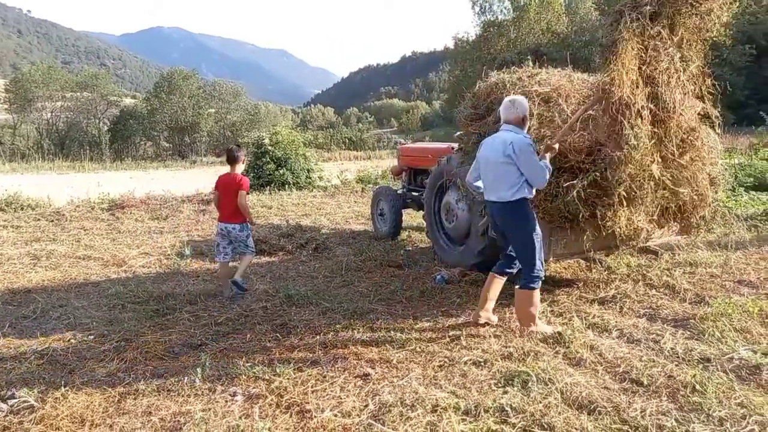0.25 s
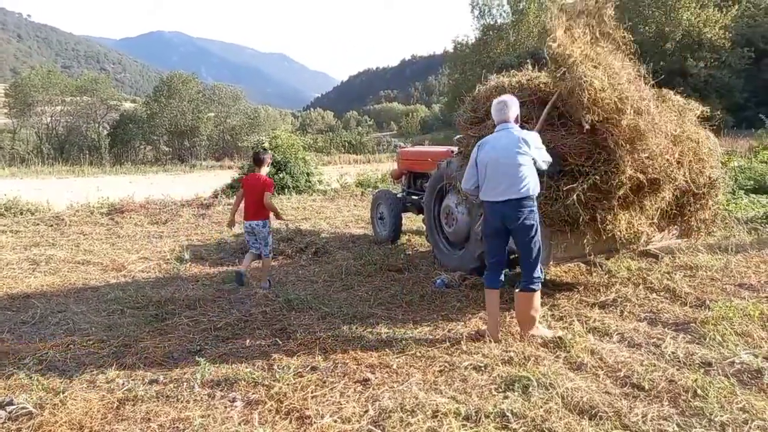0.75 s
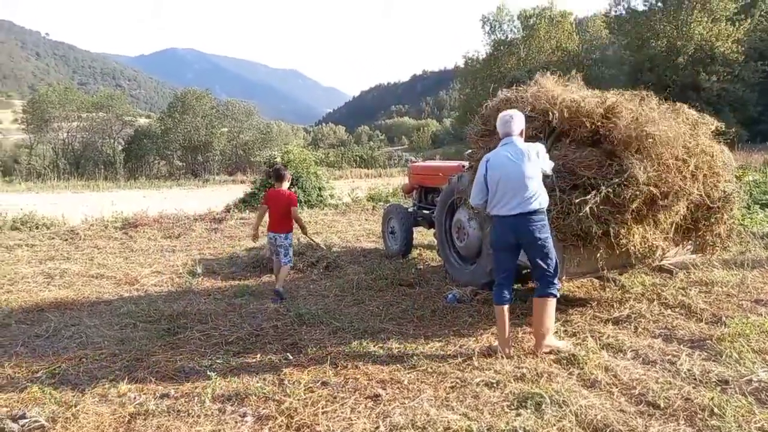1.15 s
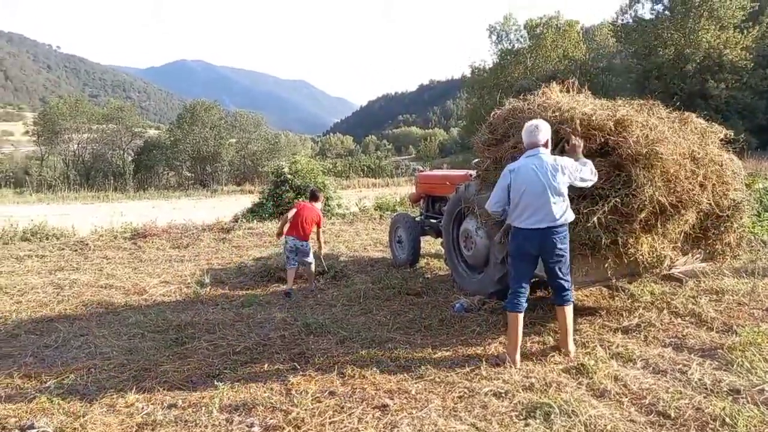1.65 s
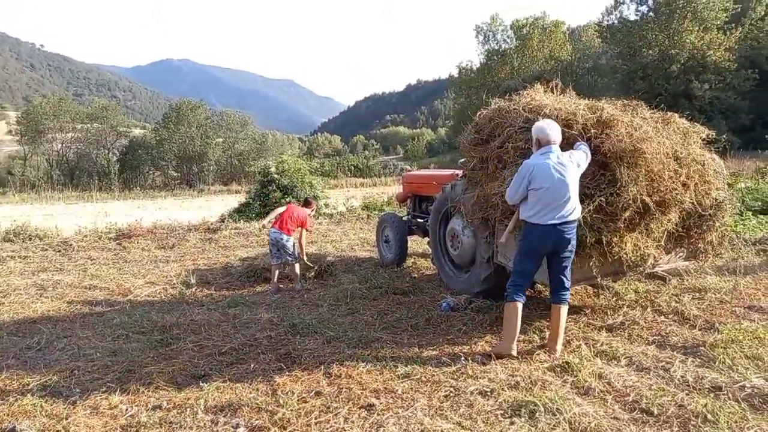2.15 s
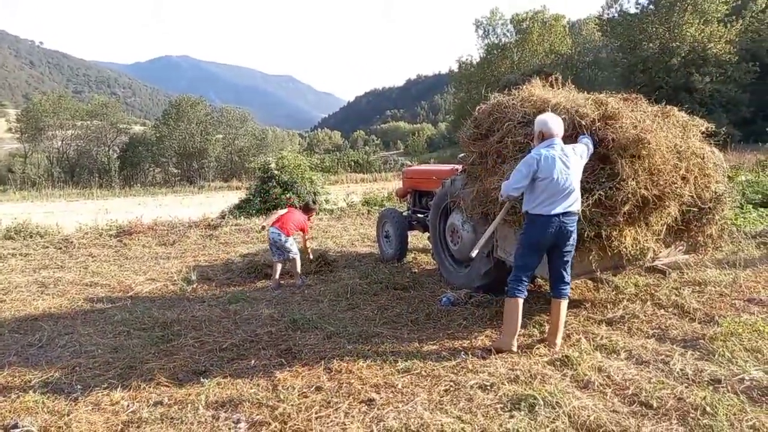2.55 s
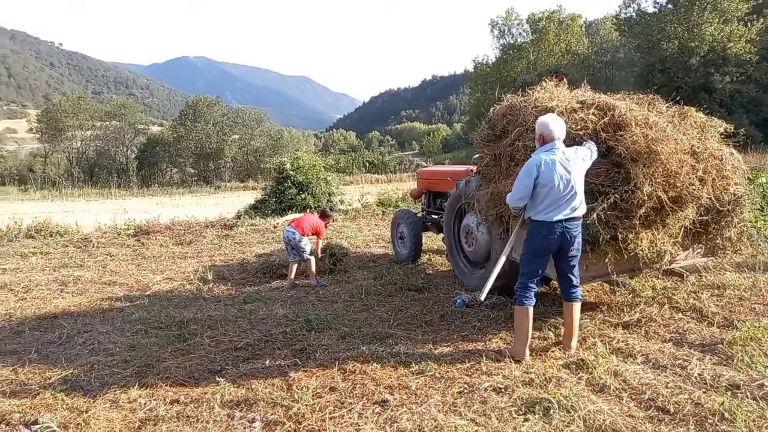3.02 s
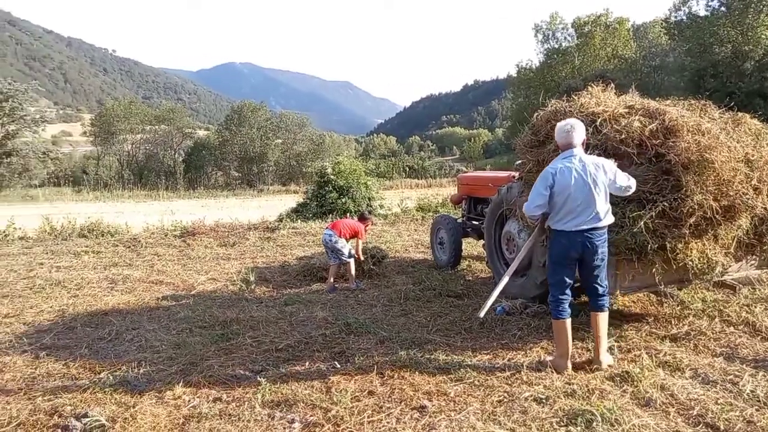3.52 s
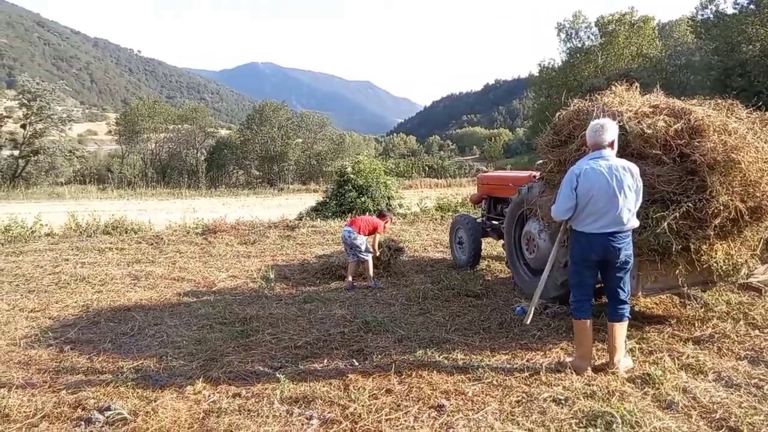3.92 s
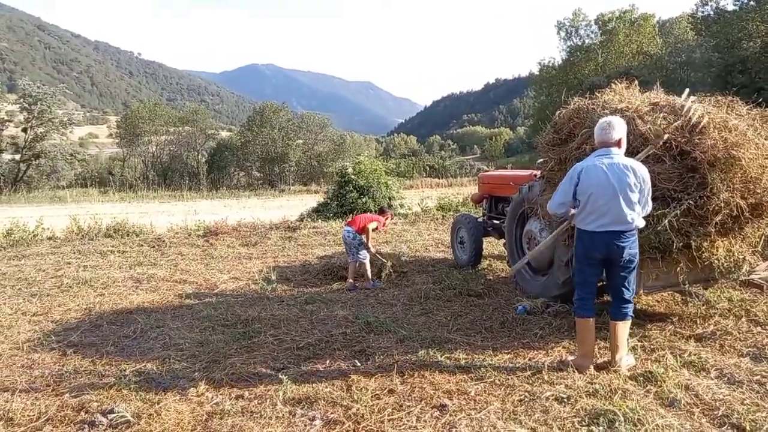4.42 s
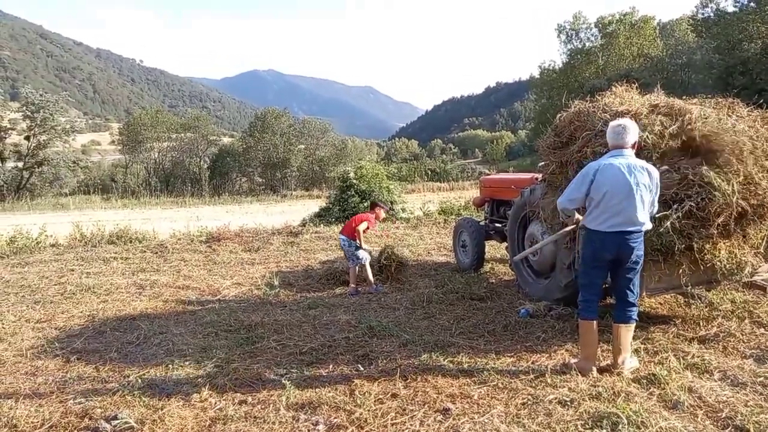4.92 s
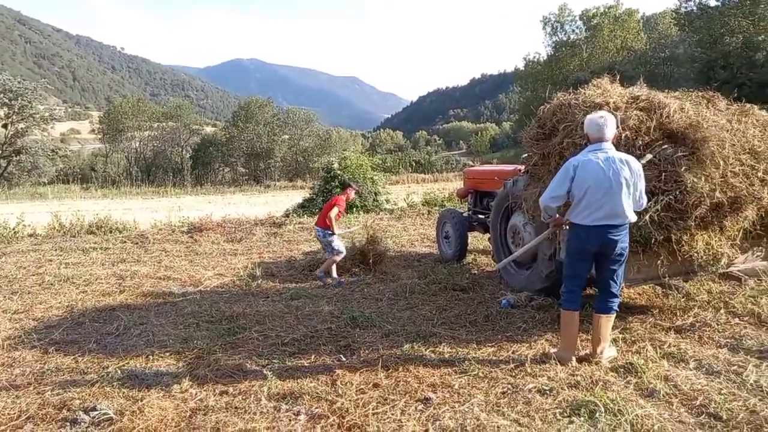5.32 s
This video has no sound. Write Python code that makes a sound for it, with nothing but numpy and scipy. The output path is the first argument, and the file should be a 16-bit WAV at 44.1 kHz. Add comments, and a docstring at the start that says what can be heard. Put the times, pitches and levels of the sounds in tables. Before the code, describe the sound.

Outdoors in an open field, a few metres from a stereo microphone, dry hay rustles faintly, then a forkful lands with a bright crackling rush and soft thump. Faint wood knocks and a tiny creak follow, then longer rustling as the load is pressed. It quiets until one loud, short fork stroke, which trails off in crackles. A very faint low engine and airy hush lie beneath.

```python
"""Dry hay is forked onto a trailer in an open field, a few metres from a two-port microphone.
First small rustles, then near 0.9 s a forkful lands and slumps; wood knocks and creaks near 1.6 s.
From 1.9 s a hand presses the load; quiet rustling follows, until one hard fork stroke near 4.9 s trails off.
Hay is dense filtered clicks, bright for thin stalks and deep for stems; snaps and scuffs are shaped noise,
knocks damped tones. Behind run a two-tone engine, noise for air and far rush, and low swelling bumps."""
import sys
import numpy as np
from scipy import signal
from scipy.fft import rfft, irfft
from scipy.io import wavfile

SR = 44100
rng = np.random.default_rng(int(sys.argv[2]) if len(sys.argv) > 2 else 0)


def materialize(psi):
    """Save the field psi as 16-bit PCM at rate SR to the path in sys.argv[1].

    A 1-D psi becomes a single channel; in a 2-D psi each row is a channel.
    """
    bounded = np.clip(np.atleast_2d(psi).T, -1, 1)
    quanta = np.round(bounded * 32767).astype(np.int16)
    wavfile.write(sys.argv[1], SR, quanta)


N = 245390
TIME = np.arange(N) / SR  # s

# Levels are those before the colour of the microphone ports; left and right are the two ports.
# open-air background spectrum: f/Hz, level/dB
FIELD_SPECTRUM = [(22, -27), (42, -6.5), (75, 6), (125, -0.5), (190, -13.5), (330, -12), (560, -19.5),
                  (880, -13), (1400, -17.5), (2100, -24.5), (3200, -31.5), (6500, -14.5), (12000, -15.5),
                  (15800, -19)]
# far rush, its treble lost over the distance: f/Hz, level/dB
FAR_RUSH_SPECTRUM = [(100, -14), (300, -7.5), (550, -9.5), (800, 1), (1050, 3.5), (1500, -3), (1900, -19),
                     (3000, -22.5), (8000, -54)]
# level of the far engine over time: t/s, level/dB
ENGINE_LEVEL = [(0, -60.5), (.8, -60.5), (1.8, -56.5), (3.4, -62.5), (4.8, -59.5), (5.4, -57)]
# low bumps: wind or handling at the microphone, and at 0.91 and 1.04 s the thump of the landing load:
# centre t/s, peak level/dB, f/Hz, Gaussian spread/s, left minus right/dB
LOW_BUMPS = [(0.475, -47, 79.4, 0.014, 3.5), (0.91, -47.5, 77, 0.053, 0), (1.042, -45, 80, 0.02, 5),
             (2.208, -64, 45.7, 0.024, 18.5), (3.909, -48, 71.85, 0.025, 16.5),
             (4.121, -52, 69.2, 0.0065, 26), (4.241, -52, 64.8, 0.022, 28.5)]
# soft thuds of weight on the trailer bed: centre t/s, level at the centre/dB, Gaussian spread/s
BED_THUDS = [(0.904, -61, 0.11), (2.49, -63.5, 0.071)]
# spectrum of the shaken trailer bed: f/Hz, level/dB
BED_SPECTRUM = [(25, -12), (60, 6), (140, -6.5), (260, -9), (450, -17.5), (900, -31), (3000, -52)]
# dull scuffs of feet and clothes: centre t/s, level at the centre/dB, Gaussian spread/s, centre f/Hz
SOFT_SCUFFS = [(1.685, -65, 0.021, 940), (1.88, -68.5, 0.02, 1030), (2.51, -65.5, 0.046, 780),
               (3.187, -63.5, 0.016, 550), (4.08, -68, 0.025, 950), (4.22, -74, 0.03, 850),
               (5.047, -65.5, 0.11, 940)]
# dull knocks of the fork and of feet:
# t/s, ring level/dB, ring f/Hz, ring decay by 60 dB/s, contact click against the ring/dB, click f/Hz
DULL_KNOCKS = [(0.089, -50.5, 267, 0.028, -8, 410), (0.636, -55.5, 1360, 0.014, -5, 1300),
               (1.644, -56.5, 1380, 0.016, 6, 2400), (1.895, -48.5, 950, 0.018, -4, 450),
               (3.159, -58.5, 254, 0.07, -5, 350), (3.176, -53, 920, 0.029, -5, 750),
               (3.185, -55, 520, 0.033, -7, 600), (3.205, -64, 680, .015, -2, 446),
               (5.427, -62, 345, 0.015, 4.5, 864)]
# one short creak of wood under strain: t/s, level/dB, starting f/Hz, length/s
WOOD_CREAK = (1.641, -60, 478, 0.033)
# single stalks that snap: t/s, peak level before SNAP_TRIM_DB/dB, centre f/Hz
STALK_SNAPS = [(0.0935, -42, 8450), (0.162, -47, 12500), (0.5822, -44, 6840), (0.618, -42, 12600),
               (1.848, -45, 12300), (1.92, -37, 12500), (1.926, -32, 12500), (2.128, -39, 12700),
               (2.233, -37, 12500), (2.367, -35, 8100), (3.847, -56, 12430), (3.884, -46, 11500),
               (3.934, -49, 8250), (4.0165, -45, 12300), (4.672, -45, 6760), (4.693, -38.5, 12200),
               (4.81, -41, 12000), (5.055, -34, 13000), (5.423, -44.5, 12300), (5.43, -42, 12100),
               (5.4637, -38, 12400)]
# spectrum of thin stalks rubbing: f/Hz, level/dB
STALK_SPECTRUM = [(300, -58.5), (1000, -21.5), (2200, -30), (3200, -12.5), (4200, -6.5), (5500, -6),
                  (7000, 0), (8200, -2), (10000, 0), (12500, 1.5), (15800, -2)]
# spectrum of thick stems bending inside the load: f/Hz, level/dB
STEM_SPECTRUM = [(25, -23), (60, -10), (200, -15.5), (450, -14.5), (600, -7.5), (780, 1), (1050, -4),
                 (1400, 3), (1800, 0), (2100, 3.5), (2450, 4.5), (3000, 6), (5000, -1.5), (9000, -4),
                 (15000, -12)]
# each push, toss or pat of hay swells, holds and dies away: full at t/s, rustle level before trim/dB, rise/s,
# hold/s, fall/s, deep crunch against the rustle before trim/dB, delay at the left/ms, sheen of fine tips/dB.
# At 0.78 s loose hay trails from the raised fork; at 0.80 s the forkful's edge catches the load,
# at 0.86 s it lands, at 1.05 s it slumps; at 1.92 s a hand presses the load into shape;
# at 4.86 s the tines slide in, at 4.91 s comes one hard stroke of the fork.
HAY_STROKES = [(0.078, -63.5, 0.063, 0.0091, 0.04, -18, 0.12, 4.5),
               (0.144, -63.5, 0.11, 0.01, 0.045, -15.5, 0.13, 0.5),
               (0.236, -56.5, 0.067, 0.0095, 0.025, -20, 0.27, 1.5),
               (0.395, -65, 0.05, 0.011, 0.06, -10, 0.094, 0),
               (0.583, -59, 0.098, 0.05, 0.13, -14, 0.12, -6),
               (0.78, -49.5, 0.48, 0.17, 0.45, -27, 0.16, 0),
               (0.799, -44.5, 0.049, 0.024, 0.05, -14, 0.18, 1),
               (0.861, -34.5, 0.1, 0.043, 0.23, -15, .13, 0.2),
               (1.046, -46.5, 0.027, 0.0087, 0.14, -13, 0.08, -2),
               (1.263, -60.5, 0.09, 0.05, 0.13, -24, 0.18, -1.5),
               (1.541, -53, 0.11, 0.027, 0.093, -22, 0.014, -8),
               (1.668, -58.5, 0.081, 0.03, 0.14, -12.5, 0.16, -8),
               (1.808, -56.5, 0.16, 0.078, 0.08, -24, 0.14, 1),
               (1.921, -47.5, 0.077, 0.33, 0.27, -18, 0.14, 0),
               (2.256, -43.5, 0.15, 0.05, 0.22, -20, .14, -1.5),
               (2.368, -42, 0.13, 0.11, 0.81, -19.5, .14, -3),
               (2.53, -46.5, 0.12, 0.077, 0.16, -17.5, 0.12, -1),
               (2.783, -56.5, 0.041, 0.037, 0.41, -28, 0.11, 2),
               (3.011, -49.5, 0.33, 0.16, 0.18, -20.5, .15, -2),
               (3.474, -66.5, 0.045, 0.0087, 0.068, -16.5, 0.0045, 6.5),
               (3.59, -66, 0.04, .015, 0.052, -29, 0.0063, 2.5),
               (3.741, -55.5, 0.16, 0.026, 0.065, -24, 0.0056, 5.5),
               (4.073, -59.5, 0.15, 0.05, 0.25, -17.5, 0.0041, 8),
               (4.219, -61, 0.06, 0.035, 0.12, -25, 0.004, 7),
               (4.306, -57.5, 0.14, 0.078, 0.11, -21.5, 0.003, 6),
               (4.668, -57.5, 0.057, 0.015, 0.029, -19.5, 0.14, 0.5),
               (4.856, -45.5, 0.072, 0.035, 0.072, -22, 0.28, -1),
               (4.907, -29.5, 0.083, 0.053, 0.067, -20, 0.21, -0.5),
               (4.99, -45.5, 0.11, 0.062, 0.67, -18, 0.2, -1.5),
               (5.188, -47, 0.18, 0.06, 0.2, -22, 0.21, 1),
               (5.428, -57.5, 0.067, 0.07, 0.26, -10.5, 0.17, -2.5)]
# the heap never quite rests: rustle level before trim/dB, deep crunch against the rustle before trim/dB,
# delay at the left/ms, sheen/dB
HEAP_SETTLING = (-73.5, -20, 0.94, 6.5)
# body resonances of the two microphone ports: f/Hz, level/dB
LEFT_PORT_COLOUR = [(20, -4), (300, 2), (800, 0.5), (1050, -2), (1400, 2.5), (2500, 0), (3300, 2),
                    (3900, 6.5), (5400, 5), (6300, 4.5), (6880, 8), (7500, 1), (11500, 5), (14000, -3),
                    (15500, 1.5)]
RIGHT_PORT_COLOUR = [(20, -2.5), (300, 2.5), (800, 3), (1400, 3), (1950, -0.5), (2500, 0.5), (4000, 1.5),
                     (5400, 2.5), (6800, 2.5), (8200, -1), (11000, 1), (12500, 2.5), (15200, 0.5)]

TOP_HZ = 15850  # upper limit of the microphone
FAR_RUSH_DB, FAR_RUSH_LAG_MS, FAR_RUSH_PAN_DB = -68.5, 0.37, -2  # level, delay at right, left minus right
ENGINE_HZ, ENGINE_SAG_HZ_PER_S = 82.25, 0.96  # lower tone at the start and its slow fall
BEAT_HZ, BEAT_SAG_HZ_PER_S = 12.47, 0.21  # gap between the tones at the start and its slow fall
CREAK_RISE_HZ_PER_S = 1200
FAINT_SNAPS_PER_S, FAINT_SNAP_DB, FAINT_SNAP_HZ = 3, -52, 11500  # mean rate, peak before trim, centre
SNAP_TRIM_DB, RUSTLE_TRIM_DB, CRUNCH_TRIM_DB = 1, 1.0, 3.0  # added to the levels above
STROKE_RANGE_DB = 20  # change of level over one rise or fall time
CRUNCH_LATE_S = 0.008  # thick stems give way just after the thin ones slide
PAN_AHEAD_DB, PAN_DB_PER_MS = -1.34, -11  # left minus right: hay further right is later and weaker at left
TIPS_PER_S, TIPS_DB, TIPS_HZ = 220, -11.5, 13200  # dry tips: mean rate, level against the hiss, centre
# weak ground copies: level of each, step between their delays, drift of the delays, treble limit
GROUND_DB, GROUND_MS, GROUND_WANDER_MS, GROUND_TOP_HZ = -15, 1.3, 0.3, 5000


def undb(db):
    """Decibels to gain."""
    return 10 ** (np.asarray(db) / 20)


def unit(x):
    """Scale to rms 1."""
    return x / np.sqrt(np.mean(x ** 2))


def decay(t, t60):
    """Exponential fade by 60 dB in t60 seconds."""
    return np.exp(-np.log(1000) * t / t60)


def swell_at(s, spread):
    """Gaussian swell centred at s seconds."""
    return np.exp(-0.5 * ((TIME - s) / spread) ** 2)


def split(pan_db):
    """Left and right gains for a left-minus-right level."""
    return undb(np.array([[pan_db], [-pan_db]]) / 2)


def colour(x, points, size=8192):
    """Causal minimum-phase filter through (Hz, dB) points, built from the cepstrum."""
    hz, db = np.transpose(points)
    bins_hz = np.arange(size // 2 + 1) * SR / size
    log_gain = np.log(undb(np.interp(np.log(bins_hz + 1), np.log(hz), db)))
    cepstrum = irfft(log_gain)[:size // 2]
    cepstrum[1:] *= 2  # fold onto positive time
    response = irfft(np.exp(rfft(cepstrum, size)))
    return signal.oaconvolve(np.atleast_2d(x), response[None], axes=1)[:, :N]


def band(x, hz, q):
    """One broad resonance."""
    return signal.lfilter(*signal.iirpeak(min(hz, TOP_HZ), q, fs=SR), x)


def double_band(x, hz, q):
    """The same resonance twice, for steeper sides."""
    return band(band(x, hz, q), hz, q)


def walk(rate):
    """Smoothly joined random values, rate per second, with a spread near 1."""
    knots = rng.standard_normal(2048)
    # linear joining loses a third of the power
    return np.interp(TIME * rate, np.arange(len(knots)), knots) * np.sqrt(3 / 2)


def add(out, s, sound):
    """Mix a stereo sound in at time s."""
    start = max(int(s * SR), 0)
    part = sound[:, :N - start]
    out[:, start:start + part.shape[1]] += part


def scatter(x, t60, wet_db):
    """Stubble and the load throw back a short haze, different at each side."""
    t = TIME[:SR // 5]
    tail = rng.standard_normal((2, len(t))) * decay(t, t60)
    tail /= np.sqrt(np.sum(tail ** 2, axis=1, keepdims=True))
    return x + undb(wet_db) * signal.fftconvolve(x, tail, axes=1)[:, :N]


def field(level_db=-62.0):
    """Distant air and leaves: noise whose bass is shared by both sides and whose treble is less so."""
    shared = colour(rng.standard_normal(N), [(100, 2.0), (1000, -3.0), (2500, -8), (12000, -13.5)])
    apart_points = [(30, -12.0), (80, 1.0), (400, -0.5), (1000, 3.0), (2500, -1.0)]
    apart = colour(rng.standard_normal((2, N)), apart_points)
    return unit(colour(shared + apart, FIELD_SPECTRUM)) * undb(level_db + 0.64 * walk(6.3))


def far_rush(waver_db=-1.0):
    """A distant rush of dull noise, gently wavering, that reaches the left side first."""
    rush = unit(colour(rng.standard_normal(N), FAR_RUSH_SPECTRUM))[0]
    rush = rush * undb(FAR_RUSH_DB + waver_db * walk(7.6))
    late = np.interp(TIME - FAR_RUSH_LAG_MS / 1000, TIME, rush)
    return np.array([rush, late]) * split(FAR_RUSH_PAN_DB)


def engine(upper_db=-3.5, waver_db=3.5, waver_hz=0.86):
    """Only two low tones carry over the fields; they share a pitch waver and beat as the engine slows."""
    lower_hz = ENGINE_HZ - ENGINE_SAG_HZ_PER_S * TIME + waver_hz * walk(5.77)
    upper_hz = lower_hz + BEAT_HZ - BEAT_SAG_HZ_PER_S * TIME

    def tone(hz):
        """A sine whose level wavers on its own."""
        return np.sin(2 * np.pi * np.cumsum(hz) / SR) * undb(waver_db * walk(4.69))

    level_db = np.interp(TIME, *np.transpose(ENGINE_LEVEL))
    return unit(tone(lower_hz) + undb(upper_db) * tone(upper_hz)) * undb(level_db)


def bumps():
    """Each bump is a low tone in a brief swell, some mostly at one side."""
    out = np.zeros((2, N))
    for s, db, hz, spread, pan_db in LOW_BUMPS:
        tone = np.sin(2 * np.pi * (hz * TIME + rng.random()))
        out += swell_at(s, spread) * tone * undb(db) * split(pan_db)
    return out


def thuds():
    """The weight of the hay shakes the trailer bed: dull noise, alike at both sides."""
    weight = sum(undb(db) * swell_at(s, spread) for s, db, spread in BED_THUDS)
    return unit(colour(rng.standard_normal(N), BED_SPECTRUM)) * weight


def scuffs(q=1.24):
    """Something soft drags briefly: a dull swell of noise with no click."""
    out = np.zeros((2, N))
    for s, db, spread, hz in SOFT_SCUFFS:
        noise = rng.standard_normal(N) + rng.standard_normal((2, N))  # partly alike at both sides
        out += unit(double_band(noise, hz, q)) * undb(db) * swell_at(s, spread)
    return out


def knocks(click_t60=0.017, click_q=0.46):
    """A soft contact click and a damped ring, then a short haze."""
    out, t = np.zeros((2, N)), TIME[:SR // 4]
    for s, db, hz, t60, click_db, click_hz in DULL_KNOCKS:
        ring = np.sin(2 * np.pi * hz * t) * decay(t, t60)
        click = double_band(rng.standard_normal(len(t)) * decay(t, click_t60), click_hz, click_q)
        click /= np.abs(click).max()
        add(out, s, np.tile(undb(db) * (ring + undb(click_db) * click), (2, 1)))
    return scatter(out, t60=0.1, wet_db=-7)


def creak(overtone_db=-13):
    """Wood slips under strain: a short round tone that bends upward."""
    s, db, hz, length = WOOD_CREAK
    t = TIME[:int(length * SR)]
    phase = 2 * np.pi * np.cumsum(hz + CREAK_RISE_HZ_PER_S * t) / SR
    tone = np.sin(phase) + undb(overtone_db) * np.sin(2 * phase)
    tone *= np.sqrt(np.sin(np.pi * t / length))
    out = np.zeros((2, N))
    add(out, s, np.tile(undb(db) * tone, (2, 1)))
    return scatter(out, t60=0.1, wet_db=-12)


def snaps(t60=0.0071, q=2.0):
    """A brittle stalk breaks with one bright tick of noise, partly alike at both sides."""
    out, t = np.zeros((2, N)), TIME[:SR // 20]
    faint_at = TIME[rng.random(N) < FAINT_SNAPS_PER_S / SR]
    faint = [(s, FAINT_SNAP_DB, FAINT_SNAP_HZ) for s in faint_at]
    for s, db, hz in STALK_SNAPS + faint:
        crack = rng.standard_normal(len(t)) + rng.standard_normal((2, len(t)))
        tick = double_band(crack * decay(t, t60), hz, q)
        add(out, s, tick / np.abs(tick).max() * undb(db + SNAP_TRIM_DB))
    return out


def motion():
    """Strokes add in power, the strongest dominate place and tone: rustle dB, crunch dB, lag ms, sheen dB."""
    def swell(t, s, rise, hold, fall):
        """Power of one stroke: it climbs and drops by STROKE_RANGE_DB over its rise and fall times."""
        away = np.maximum(s - t, 0) / rise + np.maximum(t - s - hold, 0) / fall
        return undb(-STROKE_RANGE_DB * np.minimum(away, 10)) ** 2

    db, crunch_db, lag_ms, sheen_db = HEAP_SETTLING
    power, deep = undb(db) ** 2, undb(db + crunch_db) ** 2
    lag, sheen = power * lag_ms, power * sheen_db  # weighted by power
    for s, db, rise, hold, fall, crunch_db, lag_ms, sheen_db in HAY_STROKES:
        stroke = undb(db) ** 2 * swell(TIME, s, rise, hold, fall)
        power = power + stroke
        lag = lag + stroke * lag_ms
        sheen = sheen + stroke * sheen_db
        deep = deep + undb(db + crunch_db) ** 2 * swell(TIME - CRUNCH_LATE_S, s, rise, hold, fall)
    return 10 * np.log10(power), 10 * np.log10(deep), lag / power, sheen / power


def crackle(per_second, lag_ms, spread_db, width_ms, bounce_db, bounce_ms, count=2):
    """Tiny clicks, each from its own spot, bounce through the heap on separate paths to each side."""
    at = np.flatnonzero(rng.random(N) < per_second / SR)
    size = undb(spread_db * np.minimum(rng.exponential(size=N), 4)) * rng.choice([-1, 1], N)
    size = (size / np.sqrt(per_second))[at]  # denser clicks are smaller

    def arrive(delay_ms, strength):
        """The clicks after their travel time."""
        late = np.round(delay_ms[at] * SR / 1000).astype(int)
        return np.bincount(np.clip(at + late, 0, N - 1), strength, N)

    spot_ms = lag_ms + width_ms * rng.standard_normal(N)
    sides = np.array([arrive(spot_ms, size), arrive(np.zeros(N), size)])
    for side in sides:
        for _ in range(count):
            sign = rng.choice([-1, 1], N)[at]
            side += arrive(bounce_ms * rng.exponential(size=N), sign * size * undb(bounce_db))
    return unit(sides)


def straws(lag_ms, per_second=700, t60=0.02):
    """Hollow straws are flicked and each rings for a moment at its own pitch."""
    out, t = np.zeros((2, N)), TIME[:int(t60 * SR)]
    lag_s = lag_ms / 1000
    for when, pitch, size in rng.random((int(per_second * N / SR), 3)):
        hz = 1500 + 13500 * pitch
        times = np.array([t - lag_s[int(when * N)], t])  # the left side lags in phase
        ring = np.sin(2 * np.pi * hz * times) * decay(t, t60)
        add(out, when * N / SR, ring * size ** 2)
    return unit(out)


def tips(lag_ms, q=1.9):
    """Dry tips break in a fine, bright, uneven crackle."""
    clicks = crackle(TIPS_PER_S, lag_ms, spread_db=2.5, width_ms=0.05, bounce_db=-4, bounce_ms=0.6)
    return unit(double_band(clicks, TIPS_HZ, q))


def crunch(db, lag_ms):
    """Thick stems give way under weight: even-sized clicks with a deep colour."""
    clicks = crackle(3600, lag_ms, spread_db=0.0, width_ms=0.062, bounce_db=-7, bounce_ms=4)
    return unit(colour(clicks, STEM_SPECTRUM)) * undb(db + CRUNCH_TRIM_DB + 1.3 * walk(45))


def rustle(db, lag_ms, sheen_db, sheen_hz=10500, sheen_q=1.15):
    """Thin stalks slide over each other in little rushes; the more hay moves, the denser the clicks."""
    per_second = 5000 * undb(0.5 * (db + 52))
    clicks = crackle(per_second, lag_ms, spread_db=0.3, width_ms=0.011, bounce_db=-5, bounce_ms=3)
    hiss = colour(clicks + undb(-15) * straws(lag_ms), STALK_SPECTRUM)
    hiss = hiss + (undb(sheen_db) - 1) * band(hiss, sheen_hz, sheen_q)
    stalks = unit(hiss) + undb(TIPS_DB) * tips(lag_ms)
    pan_db = PAN_AHEAD_DB + PAN_DB_PER_MS * lag_ms
    rushes_db = 0.1 * walk(140) + 0.93 * walk(22.12)
    return stalks * undb(db + rushes_db + np.array([pan_db, -pan_db]) / 2 + RUSTLE_TRIM_DB)


def ground(x, count=3):
    """Weak dull bounces off the uneven ground, on other paths to each side, ripple the middle of the sound."""
    out = x.copy()
    dull = signal.lfilter(*signal.butter(2, GROUND_TOP_HZ, fs=SR), x)
    for heard, side in zip(out, dull):
        for path in range(count):
            late_ms = GROUND_MS * (1 + path + rng.random()) + GROUND_WANDER_MS * walk(4)
            bounce = np.interp(TIME - late_ms / 1000, TIME, side)
            heard += undb(GROUND_DB) * (-1) ** (path + 1) * bounce
    return out


def scene():
    """Hay and fork over the sounds of the valley."""
    rustle_db, crunch_db, lag_ms, sheen_db = motion()
    background = field() + far_rush() + engine() + bumps()
    trailer = thuds() + scuffs() + knocks() + creak()
    hay = ground(rustle(rustle_db, lag_ms, sheen_db) + crunch(crunch_db, lag_ms)) + snaps()
    return background + trailer + hay


def record(dry):
    """Each microphone port adds its own colour; a steep filter ends the treble at TOP_HZ."""
    ports = np.vstack([colour(dry[0], LEFT_PORT_COLOUR), colour(dry[1], RIGHT_PORT_COLOUR)])
    return signal.sosfilt(signal.ellip(12, 0.2, 70, TOP_HZ, fs=SR, output="sos"), ports)


dry = scene()
out = record(dry)
materialize(out)
```